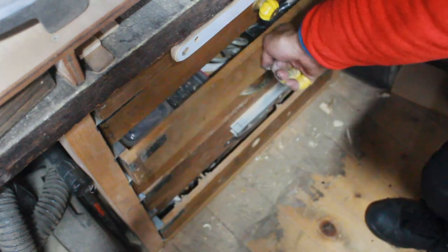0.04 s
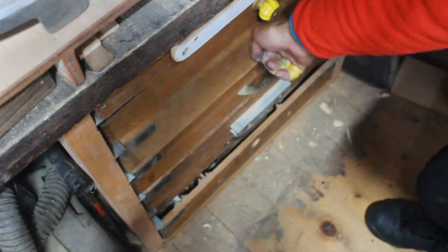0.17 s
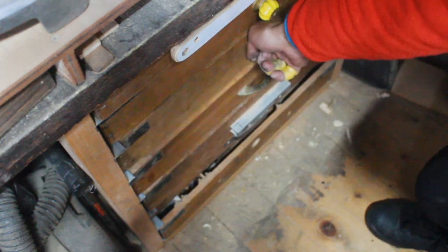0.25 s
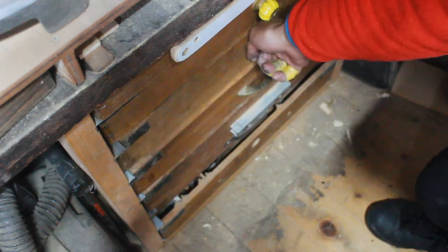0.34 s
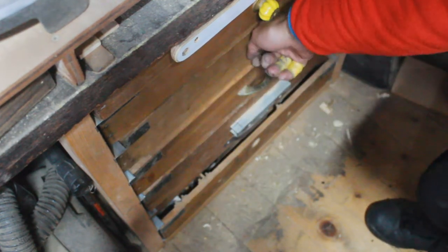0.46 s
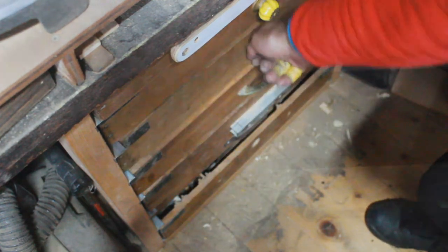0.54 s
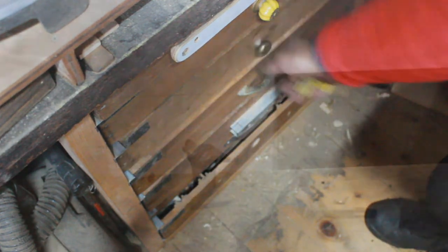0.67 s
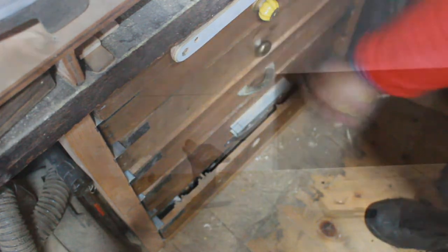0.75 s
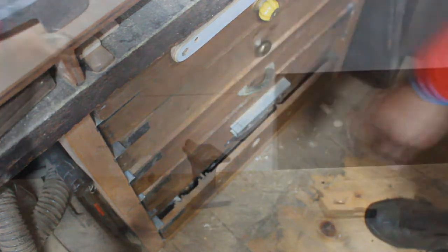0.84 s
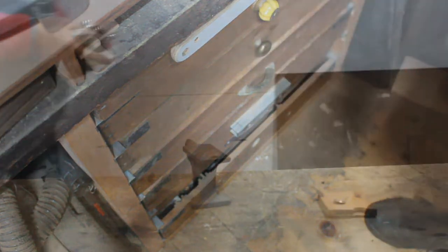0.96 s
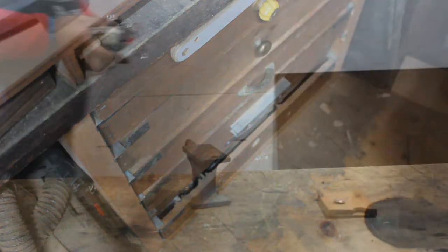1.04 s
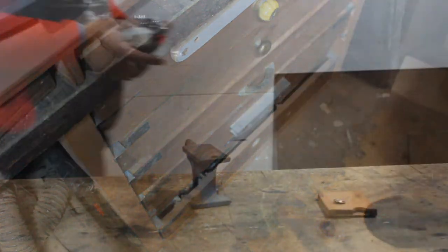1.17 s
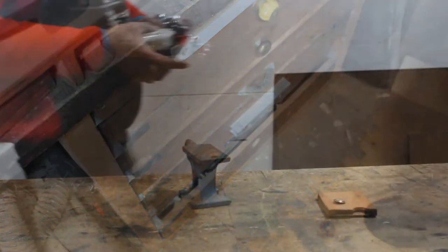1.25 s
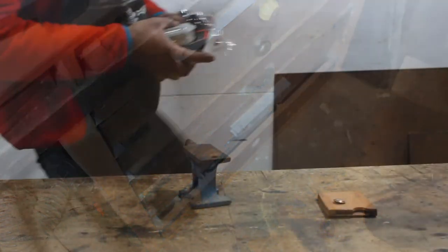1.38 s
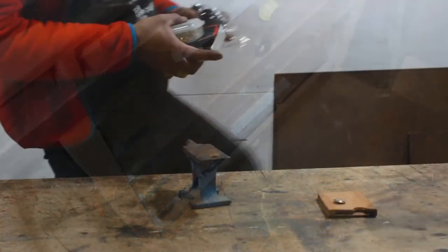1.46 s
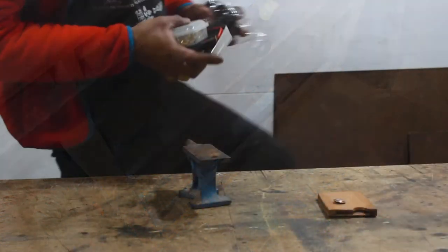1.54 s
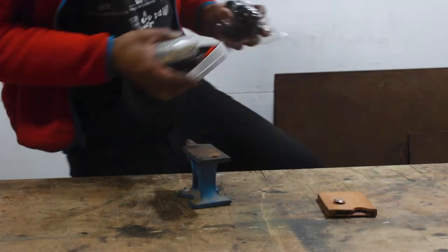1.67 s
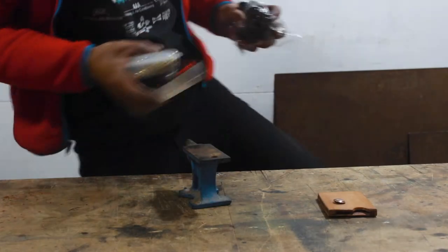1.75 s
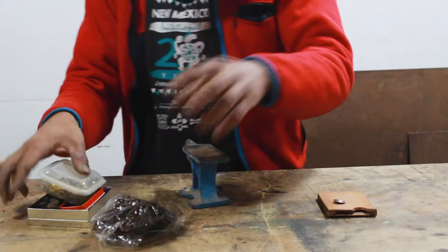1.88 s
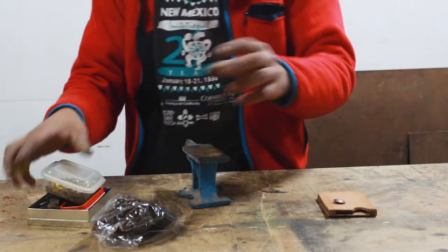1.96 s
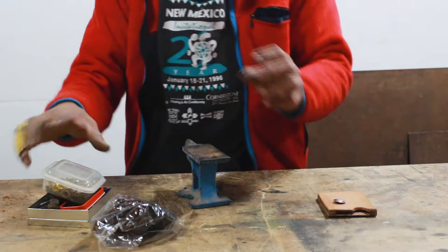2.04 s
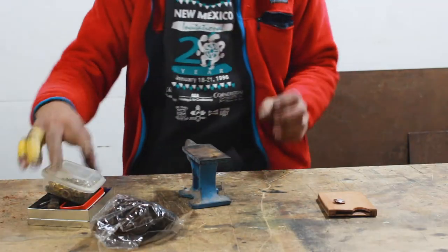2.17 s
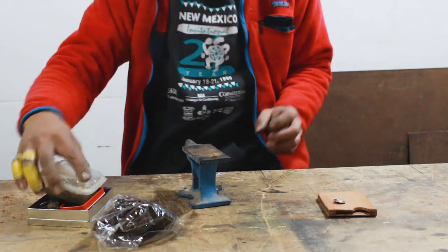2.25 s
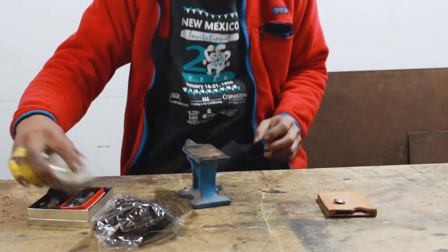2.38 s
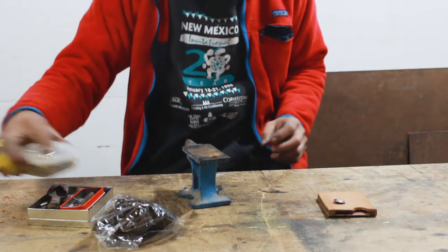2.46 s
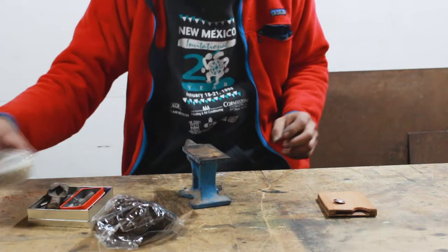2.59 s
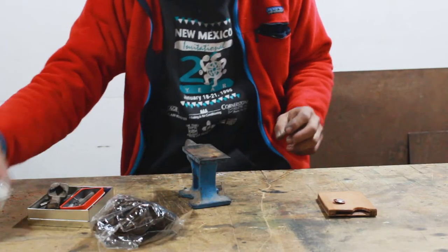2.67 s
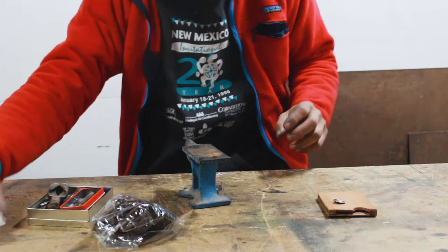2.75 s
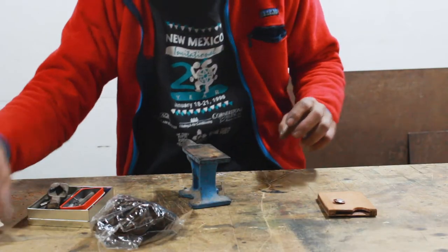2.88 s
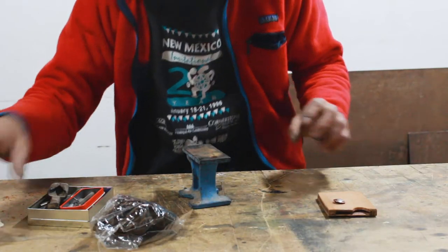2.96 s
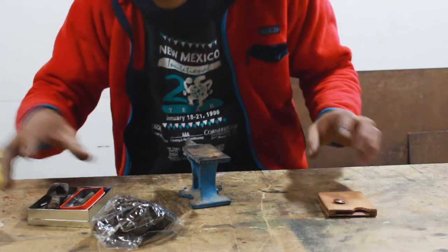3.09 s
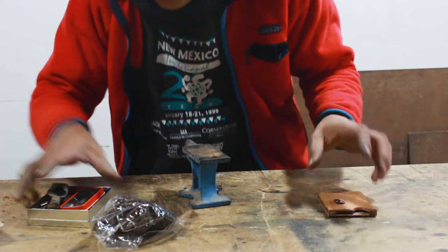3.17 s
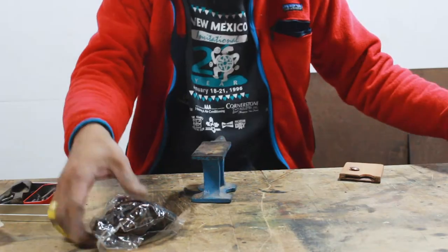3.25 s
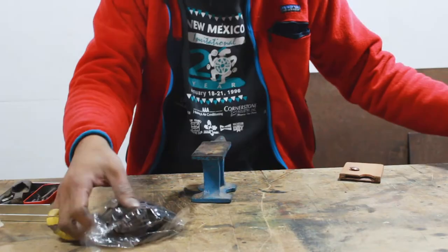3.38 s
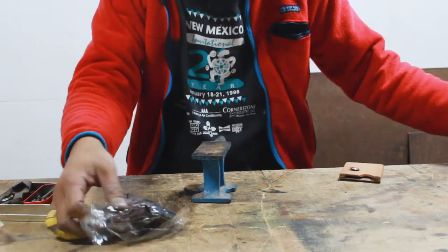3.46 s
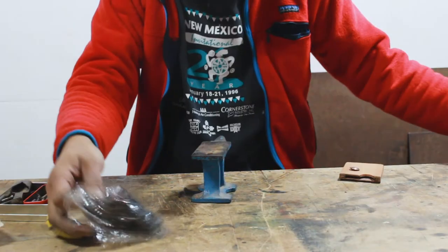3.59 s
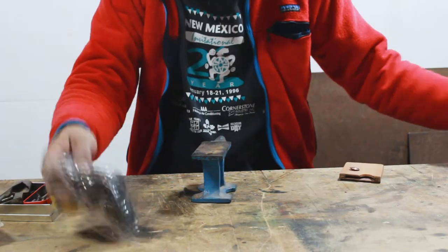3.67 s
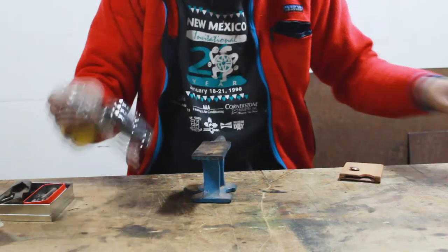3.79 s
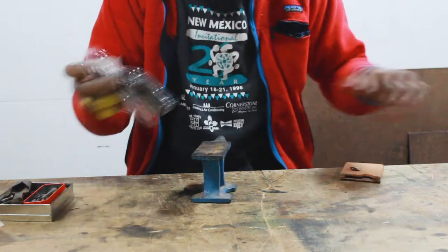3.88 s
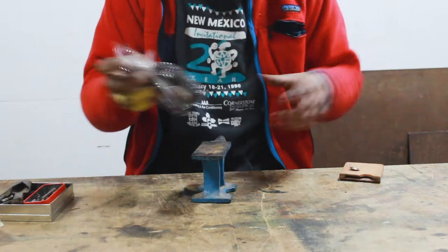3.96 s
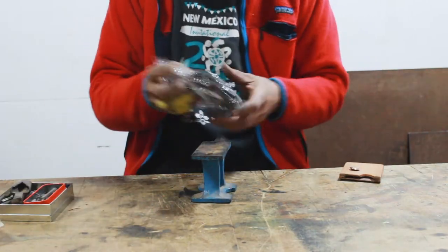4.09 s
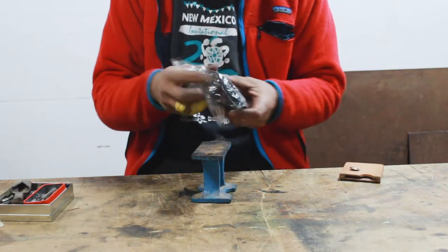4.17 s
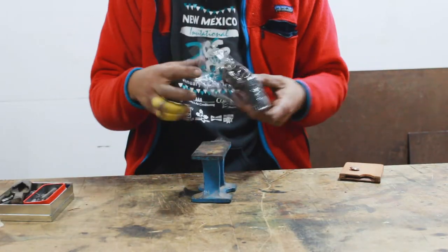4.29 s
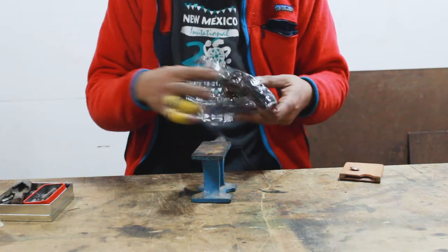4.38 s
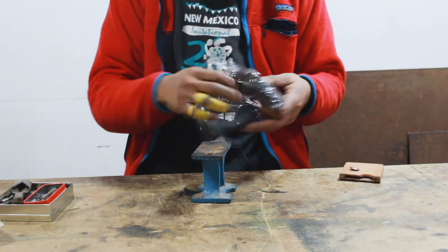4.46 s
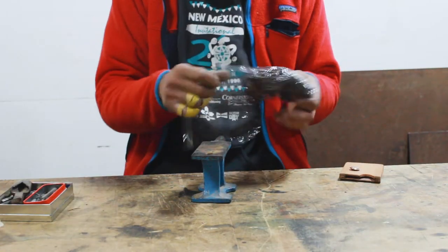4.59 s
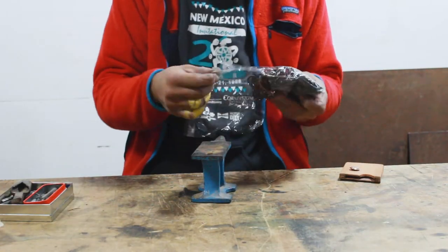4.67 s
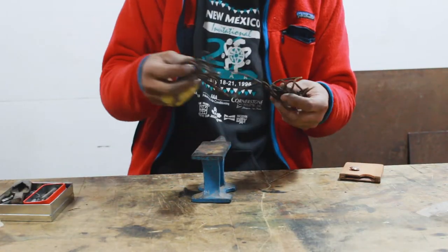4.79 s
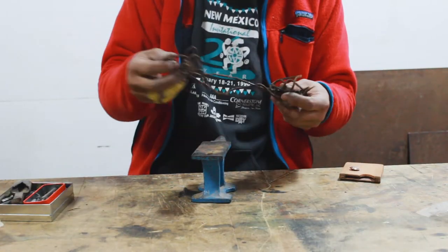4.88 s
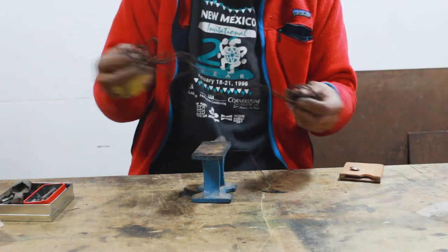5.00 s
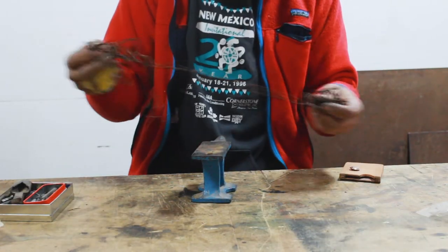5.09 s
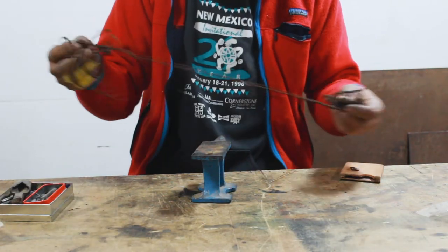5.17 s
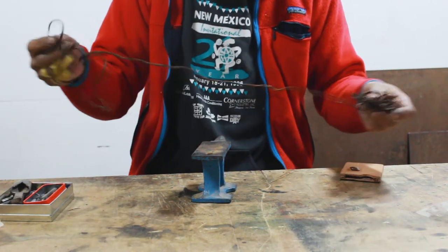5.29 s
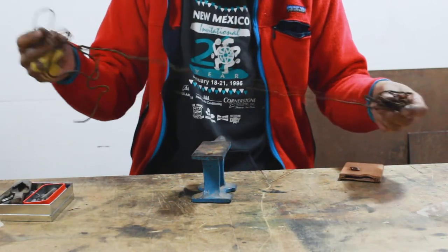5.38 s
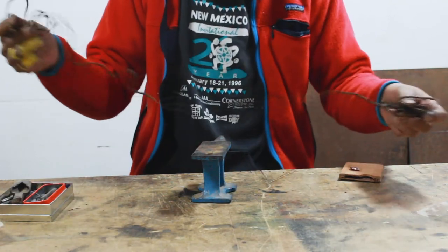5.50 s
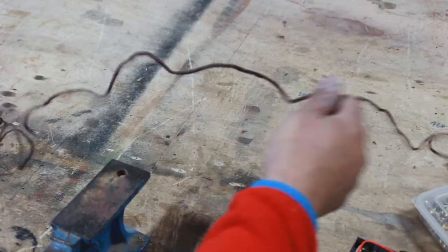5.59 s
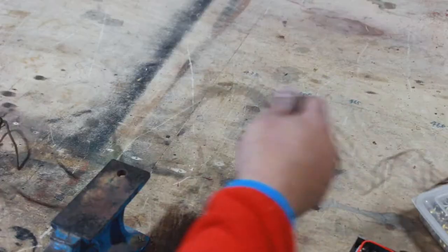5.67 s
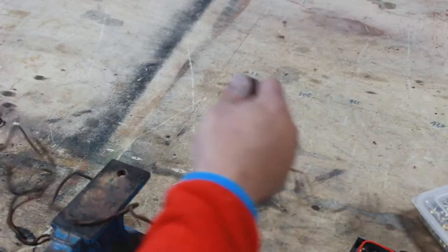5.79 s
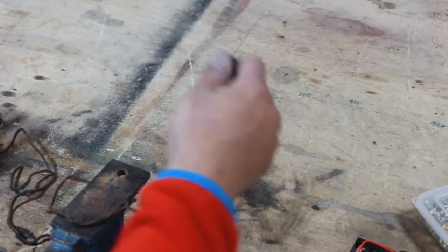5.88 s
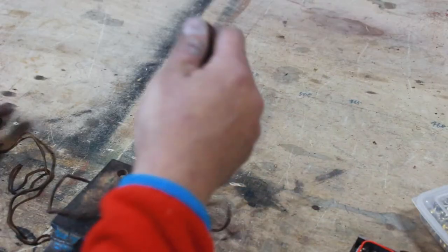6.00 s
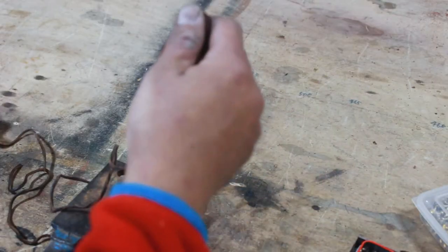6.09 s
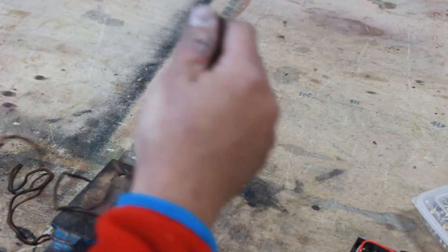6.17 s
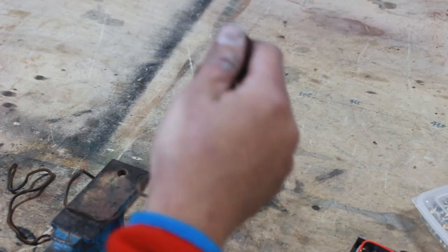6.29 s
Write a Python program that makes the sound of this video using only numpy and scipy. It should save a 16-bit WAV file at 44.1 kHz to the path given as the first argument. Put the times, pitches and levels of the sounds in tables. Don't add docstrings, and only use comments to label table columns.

```python
import sys
import numpy as np
from scipy import signal
from scipy.fft import rfft, irfft, next_fast_len
from scipy.io import wavfile
from scipy.ndimage import map_coordinates

SR = 44100
rng = np.random.default_rng(int(sys.argv[2]) if len(sys.argv) > 2 else 0)


def unload_audio(sound):
    columns = np.transpose(np.atleast_2d(sound))
    steps = np.round(np.clip(columns, -1, 1) * 32767)
    wavfile.write(sys.argv[1], SR, steps.astype(np.int16))


def nominal_scale(level):
    x = np.asarray(level, float) / 20
    return 10 ** x


N = 279594


def unit(x):
    return x / np.sqrt(np.mean(x ** 2) + 1e-20)


def peak(x):
    return x / np.abs(x).max()


def along(points, hz):
    f, v = np.transpose(points)
    return np.interp(np.log(hz + 1), np.log(f + 1), v)


def curves(rows):
    s, *cols = np.transpose(rows)
    return [np.interp(np.arange(N) / SR, s, c) for c in cols]


def wobble(rate_hz):
    knots = rng.standard_normal(int(N * rate_hz / SR) + 4)
    return map_coordinates(knots, [np.arange(N) * rate_hz / SR])


def filtered(x, response):
    m = next_fast_len(len(x) + SR // 4)
    return irfft(rfft(x, m) * response(np.fft.rfftfreq(m, 1 / SR)), m)[:len(x)]


def coloured(x, spectrum):
    return unit(filtered(x, lambda hz: nominal_scale(along(spectrum, hz))))


def resonances(modes):
    def response(f):
        total = 0
        for k, (centre, width, db) in enumerate(modes):
            damping = 1j * f * width
            total = total + (-1) ** k * nominal_scale(db) * damping / (centre * centre - f * f + damping)
        return total
    return response


def rough_ring(t, hz, t60, rough):
    phase = 2 * np.pi * hz * t + rough * np.cumsum(rng.standard_normal(len(t)))
    return nominal_scale(-60 * t / max(t60, .002)) * np.sin(phase)


def knocks(blows, modes, thump_hz):
    out, t = np.zeros(N + SR), np.arange(SR // 4) / SR
    soft = resonances(modes)
    loose = resonances([(2000, 4500, 0)])
    for s, db, rattle_db, contact_s, thump_db in blows:
        force = nominal_scale(-60 * t / max(contact_s, .004)) * (1 - np.exp(-t / 0.00097))
        push = force * rng.standard_normal((2, len(t)))
        body = peak(filtered(push[0], lambda hz: soft(hz) / (1 + 1j * hz / 6000) ** 2))
        rattle = peak(filtered(push[1], lambda hz: loose(hz) ** 2))
        thump = nominal_scale(-60 * t / 0.041) * np.sin(2 * np.pi * thump_hz * t)
        blow = body + nominal_scale(rattle_db) * rattle + nominal_scale(thump_db) * thump
        out[round(s * SR):][:len(t)] += nominal_scale(db) * blow
    return out[:N]


def clicks(table, t60_s):
    out, t = np.zeros(N + SR), np.arange(SR // 4) / SR
    dull = resonances([(3300, 7000, 0)])
    for s, db, hz, fizz_db, ring_db in table:
        burst = nominal_scale(-60 * t / .006) * rng.standard_normal(len(t))
        bright = resonances([(8900, 3000, fizz_db - 0.5)])
        crack = peak(filtered(burst, lambda f: dull(f) ** 3 + bright(f)))
        ring = nominal_scale(ring_db) * rough_ring(t, hz, t60_s, .3)
        out[round((s + .0007) * SR):][:len(t)] += nominal_scale(db) * (crack + ring)
    return out[:N]


# t/s, level/dB
RUNNER_GROAN = [(0.0, -34), (0.02, -37), (0.09, -30.5), (0.14, -36), (0.155, -44), (0.17, -35), (0.19, -50),
                (0.208, -47), (0.22, -15)]


def slide():
    scrape_modes = resonances([(247, 26, -8), (1610, 310, -28.5), (2590, 150, -29)])
    scrape = unit(filtered(rng.standard_normal(N), scrape_modes))
    groan_hz = 236 + 8.9 * wobble(25)
    tone = np.sin(2 * np.pi * np.cumsum(groan_hz) / SR)
    moving = np.arange(N) < .22 * SR
    return nominal_scale(curves(RUNNER_GROAN)[0]) * (0.57 * scrape + 1.03 * tone) * moving


# t/s, peak/dB, rattle/dB, contact/s, thump/dB
DRAWER_BLOWS = [
    (0.221, -3.5, -30, 0.027, -12),
    (0.235, -10.5, -19, 0.048, -28),
    (0.255, -4.5, -17, 0.035, -7.5),
    (0.266, -7, -26, 0.054, -7),
]
# f/Hz, width/Hz, level/dB
CABINET_MODES = [(234, 84, 2), (312, 142, -1), (444, 56, -1.5), (572, 130, -12.5), (990, 540, -18),
                 (1610, 780, -19.5), (2800, 1300, -30.5)]


def drawer():
    return knocks(DRAWER_BLOWS, CABINET_MODES, 116) + slide()


# t/s, peak/dB, rattle/dB, contact/s, thump/dB
BOX_BLOWS = [
    (2.7955, 8.1, -36, 0.015, -19.5),
    (2.8025, 2, -40, 0.017, -36),
]
# f/Hz, width/Hz, level/dB
BOX_MODES = [(241, 69, 9.5), (513, 190, -1), (893, 47, 2.5), (1600, 190, -17), (2330, 700, -13.5)]
# t/s, peak/dB, ring f/Hz, fizz over peak/dB, ring/dB
LID_CLAPS = [
    (2.7958, -6, 2810, -26, -2.5),
    (2.8075, 4.5, 8320, -26, -11.5),
    (2.8095, -4, 2380, 1, -6),
]


def box():
    return knocks(BOX_BLOWS, BOX_MODES, 61) + clicks(LID_CLAPS, t60_s=0.024)


# t/s, peak/dB, rattle/dB, contact/s, thump/dB
PACKET_BLOWS = [
    (1.8762, -9, -9.5, 0.12, -9),
    (1.895, -14.5, -31, 0.063, -7),
    (1.915, -14.5, -24, 0.048, -14),
]
# f/Hz, width/Hz, level/dB
PACKET_MODES = [(756, 660, 6), (1340, 1400, 6.5), (3000, 2240, 2.5)]


def packet():
    return knocks(PACKET_BLOWS, PACKET_MODES, 135)


# t/s, peak/dB, rattle/dB, contact/s, thump/dB
BENCH_BLOWS = [(1.385, -32, -14, 0.011, 4.5), (1.462, -25.5, -3, 0.04, 6), (1.555, -27.5, -14, 0.15, -5),
               (2.307, -30, -29, 0.075, -10), (3.244, -19.5, -16, 0.0088, -18),
               (3.276, -24, -38, 0.054, -22), (6.068, -31, -30, 0.091, 2)]
# f/Hz, width/Hz, level/dB
BENCH_MODES = [(220, 157, 4.5), (380, 580, -2.5), (1110, 1120, -11)]


def bench():
    return knocks(BENCH_BLOWS, BENCH_MODES, 150)


SCENE_CHANGES = [1.0845, 3.252, 3.33, 4.751]


def swells(peak_s, db, rise_s, fall_s):
    t, joins = np.arange(0, N + 64, 32) / SR, np.array(SCENE_CHANGES)
    late = t - peak_s[:, None]
    rising = -late / np.maximum(rise_s, .001)[:, None]
    falling = late / np.maximum(fall_s, .005)[:, None]
    drop_db = 20 * np.where(late < 0, rising, falling)
    same_scene = np.searchsorted(joins, t) == np.searchsorted(joins, peak_s)[:, None]
    return nominal_scale(2 * (db[:, None] - drop_db)) * same_scene


# peak t/s, crackle/dB, rise/s, fall/s, fizz over crackle/dB
BAG_SQUEEZES = [(1.105, -23.5, 0.23, 0.11, -6.5), (1.261, -29, 0.13, 0.077, -1.5),
                (1.36, -32.5, 0.13, .05, -5.5), (1.385, -28, 0.027, 0.083, -2.5),
                (1.41, -39, .02, 0.065, 2), (1.455, -35.5, .01, 0.087, -0.5),
                (2.59, -35.5, 0.051, 0.21, -1.5), (2.625, -37, .04, 0.034, -6),
                (2.697, -39, 0.024, 0.038, 4.5), (2.776, -41, .03, 0.029, -2), (3.38, -27, 0.12, 0.72, -2),
                (3.49, -30.5, 0.43, 0.7, 0), (3.59, -26, 0.43, 0.19, -16),
                (3.698, -22.5, 0.023, 0.033, -0.5), (3.728, -29, 0.036, 0.26, 1),
                (3.92, -31.5, 0.046, 0.25, 1.5), (4.06, -33.5, 0.051, 0.06, -3),
                (4.186, -21.5, 0.056, 0.21, -1.5), (4.36, -28.5, 0.23, 0.69, -3.5),
                (4.445, -32, .01, .06, 2), (4.472, -23.5, 0.034, 0.071, -4),
                (4.495, -24.5, 0.086, 0.16, -0.5), (4.56, -30, 0.17, 0.57, -4),
                (4.674, -25, .006, 0.034, 3.5), (4.715, -30, 0.045, 0.11, 0)]
# peak t/s, crackle/dB, rise/s, fall/s, fizz over crackle/dB
BRUSHES = [(.06, -45.5, 0.12, 0.27, -8), (.2, -40, 0.19, 0.11, -7.5), (.7, -60, 0.95, 1.1, -3.5),
           (.95, -50, 0.33, 0.96, -8.5), (1.823, -43.5, 0.017, .08, -1.5), (2.12, -46, 0.36, 0.61, -5),
           (2.312, -43, 0.045, 0.14, -16), (2.39, -41.5, .1, 0.036, -17), (2.546, -48, .15, .05, -10),
           (2.755, -56, .05, 0.043, -6.5), (3.31, -50.5, 0.05, 0.11, -24), (4.973, -55.5, .15, .02, 0),
           (5.051, -42.5, 0.044, 0.023, 1), (5.07, -55, .02, 0.19, 4), (5.231, -50.5, 0.078, 0.11, -1),
           (5.637, -50.5, 0.12, 0.19, -10), (5.741, -45.5, 0.046, 0.058, -25), (5.7, -58, 0.042, 0.029, 10),
           (5.86, -54.5, 0.18, .3, -4.5), (6.145, -44, 0.093, 0.19, -2.5), (6.26, -55, .2, 0.18, 1)]
# t/s, crackle/dB,
# fall/s, fizz over crackle/dB
SUDDEN_STIRS = [(.221, -37, 0.075, -35), (.26, -33.5, 0.061, -28), (.3, -45.5, 0.18, -11),
                (1.627, -41, 0.032, -30), (1.64, -49, 0.1, -24), (1.729, -46.5, 0.055, 5),
                (1.879, -26.5, 0.16, -13), (2.261, -49, 0.087, 3), (2.404, -29.5, 0.023, -31),
                (2.42, -41.5, .2, -21), (2.809, -19.5, 0.062, -8.5), (2.829, -24.5, 0.15, -8.5),
                (3.13, -33.5, 0.0092, 7), (3.145, -46.5, 0.1, 2), (4.819, -51, 0.054, -7),
                (5.001, -42.5, 0.13, -2.5), (5.302, -42, 0.13, -20), (6.212, -44.5, 0.027, 4)]
# peak t/s, level/dB, rise/s, fall/s
PART_SHIFTS = [(.06, -39, 0.15, 0.12), (.192, -39.5, 0.17, 0.018), (0.225, -14.5, 0.0071, 0.013),
               (0.267, -19.5, 0.02, 0.052), (.47, -49.5, .2, 0.62), (1.3, -35, 0.42, 0.3),
               (1.5, -46, 0.38, 0.73), (1.8, -43.5, 0.093, 0.074), (1.882, -28.5, 0.0062, 0.028),
               (2.08, -42.5, 0.053, 0.23), (2.31, -41.5, 0.031, 0.22), (2.816, -22, 0.0081, 0.12),
               (3.281, -35.5, 0.0044, 0.094), (3.594, -30, 0.02, 0.15), (3.75, -40, 0.37, 0.057),
               (4.49, -29.5, 0.11, 0.27), (4.72, -34, 0.28, .2), (5.637, -54, 0.071, 0.28),
               (5.8, -50, 0.25, 0.28), (6.067, -47, 0.016, 0.3)]


def effort():
    jolt_s = 0.00084
    jolts = [(s + jolt_s, db, jolt_s, fall, fizz_db) for s, db, fall, fizz_db in SUDDEN_STIRS]
    power = np.zeros((3, (N + 95) // 32))
    for table, body_db in [(BAG_SQUEEZES, -12), (BRUSHES, -6), (jolts, -7.5)]:
        *shape, fizz_db = np.transpose(table)
        rows = swells(*shape)
        total = rows.sum(0)
        power += [total, nominal_scale(2 * fizz_db) @ rows, nominal_scale(2 * body_db) * total]
    power[2] += swells(*np.transpose(PART_SHIFTS)).sum(0)
    return [np.interp(np.arange(N) / 32, np.arange(len(p)), np.sqrt(p)) for p in power]


def creases(per_second, spread_db, life_s):
    chance = per_second / SR * nominal_scale(6.5 * wobble(30))
    sizes = nominal_scale(2 * spread_db * rng.exponential(1, N).clip(0, 2.2))
    hits = (rng.random(N) < chance) * sizes
    power = signal.fftconvolve(hits, np.exp(-np.arange(SR // 20) / SR / life_s))[:N]
    return unit(np.sqrt(np.abs(power)) * rng.standard_normal(N))


def snaps(count, centre_hz, turns):
    clusters = rng.random(count // 4) * N
    draw = rng.random((count, 4))
    cluster = clusters[(draw[:, 0] * len(clusters)).astype(int)]
    start = (cluster + draw[:, 1] * .02 * SR).astype(int)
    hz = np.clip(centre_hz * 2 ** (3 * draw[:, 2:3] - 1.5), 800, 9500)
    size = nominal_scale(-4 * np.log(draw[:, 3:] + .07)) * np.sqrt(hz / centre_hz)
    step = np.arange(128)
    phase = hz * step / SR
    waves = size * (1 - np.exp(-4 * phase)) * np.exp(-phase / turns) * np.sin(2 * np.pi * phase)
    return unit(np.bincount((start[:, None] + step).ravel(), waves.ravel(), N + SR)[:N])


# start t/s, end t/s
FOIL_SPANS = [
    (1.08, 1.5),
    (2.55, 2.78),
    (3.33, 4.76),
]
# f/Hz, level/dB per Hz
CRACKLE_SPECTRUM = [(500, -20), (1000, 2), (2000, 3.5), (4000, 3.5), (6000, -2.5), (9000, -28),
                    (16000, -60)]
FIZZ_SPECTRUM = [(4000, -14), (6500, -2), (9000, -5), (12000, -11.5), (15500, -20), (17000, -5)]
BODY_SPECTRUM = [(120, -28), (250, 6), (500, 10.5), (1000, 4), (1800, -41)]


def hands():
    crackle, fizz, body = effort()
    crackle = crackle * nominal_scale(1.0 * wobble(28))
    fizz = fizz * nominal_scale(1.2 * wobble(35))
    t = np.arange(N) / SR
    foil = sum((t > a) & (t < b) for a, b in FOIL_SPANS)
    snappy = .4 + .6 * foil
    shared = creases(120, 5.2, 0.0014)

    def stream():
        own = creases(300, 2.6, 0.00077)
        return snappy * (0.41 * shared + 0.53 * own) + 0.85 * rng.standard_normal(N)

    colours = crackle * coloured(stream(), CRACKLE_SPECTRUM)
    colours += fizz * coloured(stream(), FIZZ_SPECTRUM)
    colours += body * coloured(stream(), BODY_SPECTRUM)
    even = np.sqrt(1.5 / (snappy ** 2 + .5))
    pops = .65 * foil * crackle * snaps(count=3200, centre_hz=4500, turns=1.4)
    return nominal_scale(-3) * (even * colours + pops)


# t/s, peak/dB, ring f/Hz, fizz over peak/dB
CREASE_POPS = [(1.085, -23, 2800, -25), (1.1113, -7, 4220, -12), (1.1498, -12, 1970, -24),
               (1.1837, -28, 3080, -10), (1.2104, -21, 3020, -6), (1.2333, -13, 2530, -29),
               (1.2682, -12.5, 2930, -9), (1.381, -25, 1740, -2), (1.4017, -22, 7100, 18),
               (1.4517, -18, 2920, -1), (2.5602, -20, 7560, -8), (2.6557, -19, 3900, -26),
               (2.7691, -16.5, 3000, -21), (2.7807, -17, 3120, -24), (3.3353, -17, 2530, -18),
               (3.3772, -14.5, 2440, -5), (3.4017, -18, 2720, -15), (3.5576, -13, 1650, -17),
               (3.958, -10, 4280, -2), (4.062, -17.5, 3300, -20), (4.1355, -21, 3450, -2),
               (4.6717, -16, 3640, -5), (4.7122, -12, 2940, -27)]


def crease_pops():
    ring_db = -9.5
    return clicks([(*pop, ring_db) for pop in CREASE_POPS], t60_s=0.022)


# t/s, peak/dB, f/Hz
SINGLE_FOLDS = [(1.0908, -14, 12500), (1.0966, -8, 4900), (1.1176, -17, 3720), (1.184, -21, 7700),
                (1.2106, -22, 5530), (1.2162, -21, 3300), (1.242, -9, 4380), (1.2467, -12, 2880),
                (1.2541, -22, 3000), (1.2627, -18, 2900), (1.3301, -18, 2700), (1.3563, -18, 4700),
                (1.3647, -13.5, 2510), (1.3737, -22, 2900), (1.4016, -15, 7100), (1.4061, -16, 14000),
                (1.4204, -20, 9500), (1.4598, -19, 9100), (1.4692, -27, 2100), (2.5663, -20, 6600),
                (2.5798, -16, 7100), (2.587, -22, 4300), (2.5958, -17, 3580), (2.6192, -16, 4700),
                (2.6345, -21, 2500), (2.6943, -23, 8200), (2.7003, -15, 8250), (2.7773, -24, 2900),
                (3.3312, -23, 5500), (3.3408, -21, 2700), (3.383, -17, 4000), (3.3886, -15, 5400),
                (3.3975, -18, 4100), (3.4204, -15, 5300), (3.4299, -13, 3600), (3.4434, -13, 5400),
                (3.4755, -14, 8400), (3.5026, -17, 4300), (3.515, -17, 4000), (3.5338, -7, 7850),
                (3.5489, -14.5, 4800), (3.5797, -18, 2680), (3.5897, -14, 1600), (3.6045, -13, 2160),
                (3.624, -14, 6300), (3.6312, -10.5, 5300), (3.6363, -15.5, 4300), (3.7014, -14, 3900),
                (3.7238, -12, 4000), (3.729, -9, 4200), (3.7556, -7, 4800), (3.817, -12, 6000),
                (3.8242, -13, 7200), (3.8604, -12, 7400), (3.8839, -15.5, 10000), (3.8919, -15, 7100),
                (3.9061, -20, 9100), (3.9276, -10, 8900), (3.9324, -17, 8800), (3.9546, -17, 3400),
                (3.9631, -12, 9100), (3.992, -19, 2400), (4.0002, -14, 2700), (4.0673, -14, 3230),
                (4.1329, -19, 9500), (4.1641, -14, 3600), (4.1761, -12, 5300), (4.1824, -17, 2700),
                (4.1989, -11, 5400), (4.227, -9, 4000), (4.2476, -16, 4600), (4.3734, -17, 3500),
                (4.3836, -13.5, 4500), (4.4198, -15, 4720), (4.4424, -15, 4300), (4.4718, -13, 4900),
                (4.4763, -17, 4300), (4.4843, -9, 9700), (4.4952, -10, 5500), (4.5114, -15, 3000),
                (4.5543, -14, 4000), (4.5964, -19, 3480), (4.6028, -17, 5900), (4.6147, -12.5, 5800),
                (4.6315, -14, 3400), (4.6768, -11, 3400), (4.7024, -11, 6660), (4.7184, -12.5, 7900)]


def folds():
    level_db, decay_cycles, grit = -2, 2.2, .15
    s, db, hz = np.transpose(SINGLE_FOLDS)[:, :, None]
    step = np.arange(128)
    phase = hz * step / SR
    envelope = (1 - np.exp(-3 * phase)) * np.exp((.7 - phase) / decay_cycles)
    waves = envelope * (np.sin(2 * np.pi * phase) + grit * rng.standard_normal(phase.shape))
    start = np.round(s * SR - SR / hz).astype(int)
    return np.bincount((start + step).ravel(), (nominal_scale(db + level_db) * waves).ravel(), N)


# t/s, peak/dB, ring f/Hz, fizz over peak/dB, ring/dB
PART_CLICKS = [(1.6272, -27, 2950, -25, 4.5), (1.729, -25, 1820, 4.5, -14), (2.032, -41, 9000, 6, -9),
               (1.8203, -36, 1830, -13, 1), (2.0128, -31.5, 1465, -56, 11.5),
               (2.2598, -20.5, 2170, -7.5, -9), (2.3101, -29, 990, -30, 2), (2.387, -43, 7840, 0, 0),
               (2.451, -41, 7900, 0, -4), (2.4044, -30.5, 2620, -27, 4), (2.892, -23, 3000, -7, -12),
               (2.9746, -23.5, 2350, -27, -13), (3.1303, -25, 1100, -11, 1.5), (3.243, -40, 1740, -17, -4),
               (4.8194, -45, 1940, -20, 0), (5.0005, -27, 3150, -29, 1), (5.027, -22, 1410, -13, -10),
               (5.1805, -37.5, 1500, -25, -2), (5.2245, -35, 2590, -23, 2.5), (5.3004, -33, 2750, -28, 9.5),
               (5.4525, -33.5, 3240, -0.5, -16), (5.6261, -34.5, 1510, -26, 3), (5.7364, -36, 2410, -32, 3),
               (5.7433, -27, 4770, -16, -12), (5.7664, -32, 1450, 10, 0), (6.0227, -35, 5260, -2, -1),
               (6.2103, -26, 2480, -6, -1)]


def part_clicks():
    return clicks(PART_CLICKS, t60_s=0.014)


# t/s, f/Hz, level/dB, t60/s, roughness/rad
OBJECT_RINGS = [(0.397, 306, -19, 0.068, 0.011), (.561, 310, -22.5, 0.097, 0.0081),
                (.562, 2430, -50, 0.32, 0.0026), (1.629, 2200, -36, 0.14, 0.04),
                (3.717, 4200, -15, 0.39, 0.457), (2.797, 895, -21, 0.23, 0.13),
                (0.32, 500, -12.5, 0.15, 0.036), (3.131, 1300, -36, 0.14, 0.15),
                (5.302, 2514, -35, 0.28, 0.357), (6.7, 2250, -36, 0.17, 0.22)]


def rings():
    out, t = np.zeros(N + SR), np.arange(SR // 4) / SR
    for s, hz, db, t60, rough in OBJECT_RINGS:
        onset = 1 - np.exp(-t / 0.0047)
        out[round(s * SR):][:len(t)] += nominal_scale(db) * onset * rough_ring(t, hz, t60, rough)
    return out[:N]


# t/s, level/dB
HUM_LEVEL = [(0.0, -42), (0.41, -38.5), (0.83, -44), (2.25, -40), (2.9, -43.5), (3.34, -47.5),
             (3.83, -51.5), (4.47, -46.5), (5.42, -42.5), (6.34, -41.5)]
# f/Hz, level/dB per Hz
HUM_SPECTRUM = [(12, -38), (20, -25), (48, -6), (76, 7), (400, -13), (520, -47), (880, -120)]
HISS_SPECTRUM = [(120, -35), (200, -7), (240, -3.5), (597, -11.5), (654, -11), (3370, -20), (9540, -28.5),
                 (14800, -36), (15600, -39)]


def air():
    sway_db = 1.2 * wobble(7)
    drone = unit(filtered(rng.standard_normal(N), resonances([(68.7, 20, 0)])))
    rumble = coloured(rng.standard_normal(N), HUM_SPECTRUM)
    hum = nominal_scale(curves(HUM_LEVEL)[0] - 2.0 + sway_db) * (rumble + 0.79 * drone)
    whine = nominal_scale(-72 + 3 * wobble(15)) * np.sin(2 * np.pi * 15734.5 * np.arange(N) / SR)
    whine *= np.arange(N) > SCENE_CHANGES[0] * SR
    hiss = nominal_scale(-54.0) * coloured(rng.standard_normal(N), HISS_SPECTRUM)
    return hum + hiss + whine


# f/Hz, t60/s
ROOM_T60 = [(150, 0.22), (1000, 0.46), (4000, 0.3), (12000, 0.15)]


def room(x, wet_db):
    out = x.copy()
    ends = np.round(np.array(SCENE_CHANGES + [N / SR]) * SR).astype(int)
    starts = np.union1d(np.arange(0, N, SR // 3), ends)
    for a, b in zip(starts[:-1], starts[1:]):
        hz, t, z = signal.stft(rng.standard_normal(SR // 2), SR, nperseg=256)
        decay = nominal_scale(-60 * t / along(ROOM_T60, hz)[:, None])
        tail = signal.istft(z * decay, SR, nperseg=256)[1]
        scene_end = ends[ends > a][0]
        delayed = np.pad(x[a:b], (130, 0))
        wet = signal.fftconvolve(delayed, tail / np.linalg.norm(tail))[:scene_end - a]
        out[a:a + len(wet)] += nominal_scale(wet_db) * wet
    return out


def scene():
    mix = room(drawer() + bench() + packet(), -5.5)
    mix += room(box(), -15.0)
    mix += room(hands() + rings(), -14.0)
    mix += room(crease_pops() + folds(), -5)
    mix += room(part_clicks(), -1.2)
    return (mix + air())[None]


def top_cut(x):
    return signal.sosfilt(signal.butter(12, 16460, fs=SR, output="sos"), x)


def record(dry):
    bass_cut = filtered(dry[0], lambda hz: 1j * hz / (35 + 1j * hz))
    clipped = np.clip(bass_cut, -1, 1)
    limited = filtered(clipped, lambda hz: np.where(hz < 15790, 1, .012))
    return top_cut(limited[None])


dry = scene()
out = record(dry)
unload_audio(out)
```